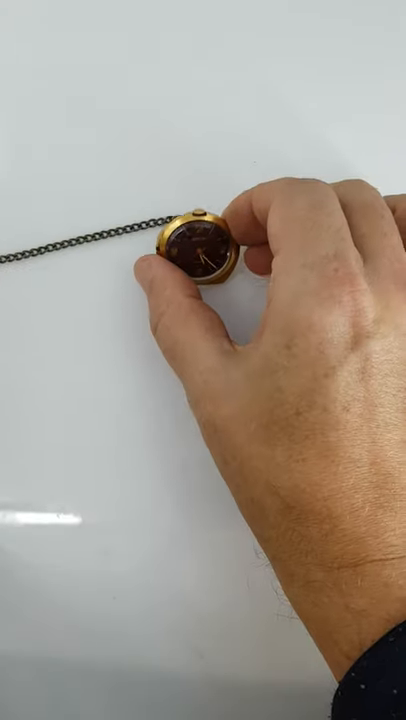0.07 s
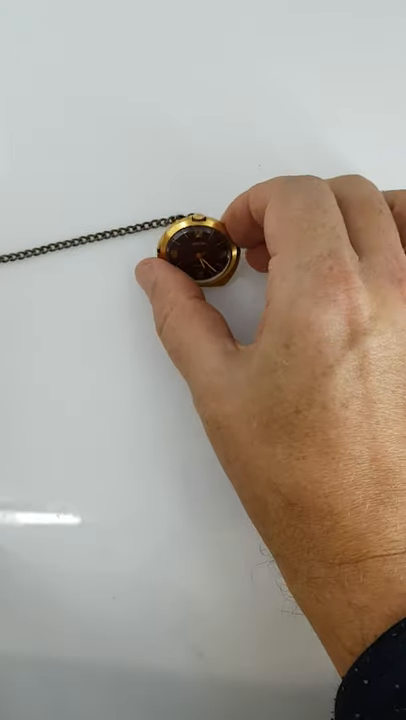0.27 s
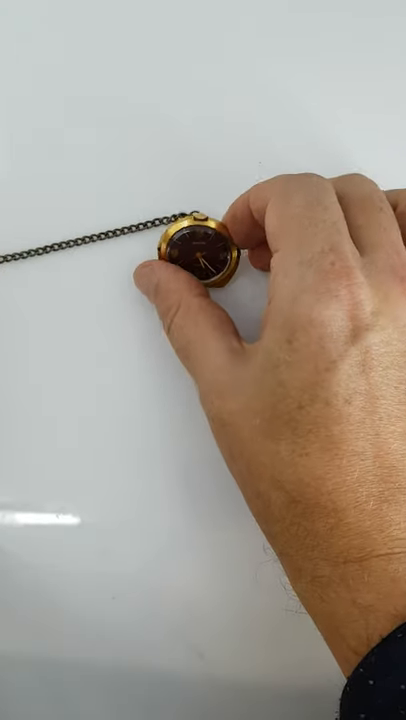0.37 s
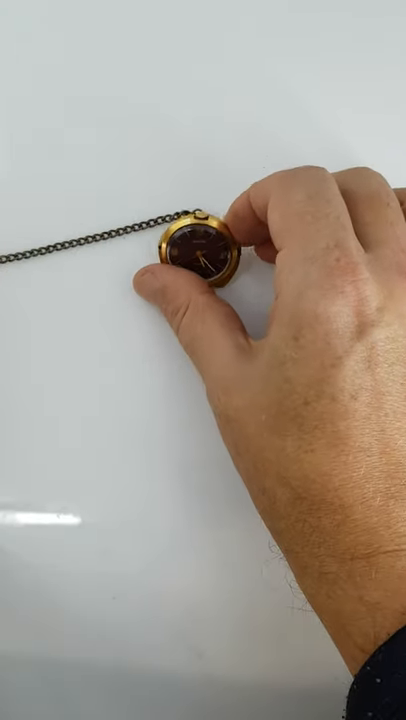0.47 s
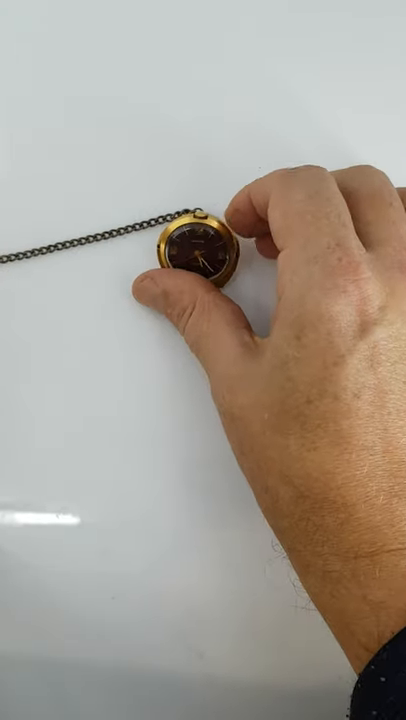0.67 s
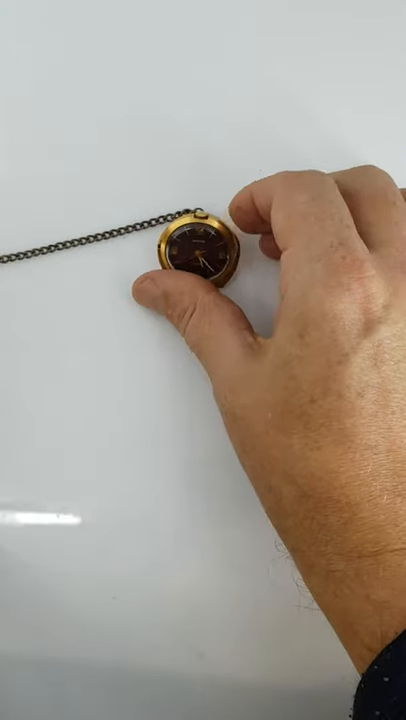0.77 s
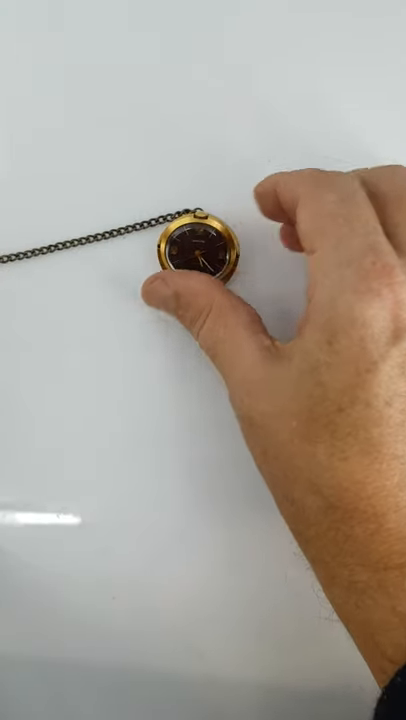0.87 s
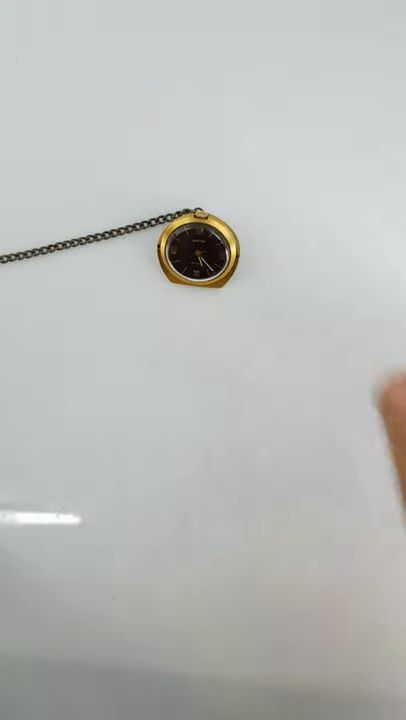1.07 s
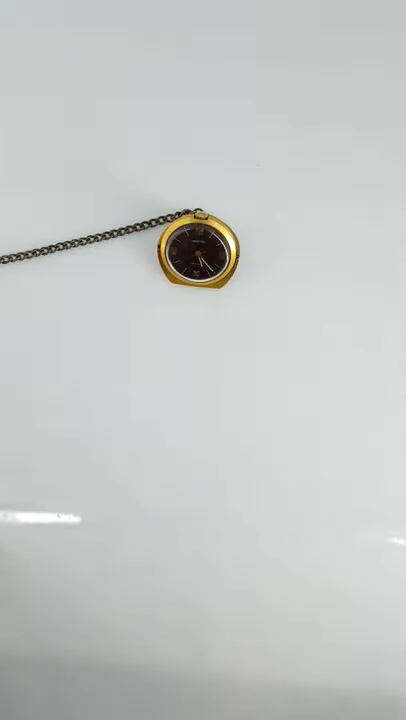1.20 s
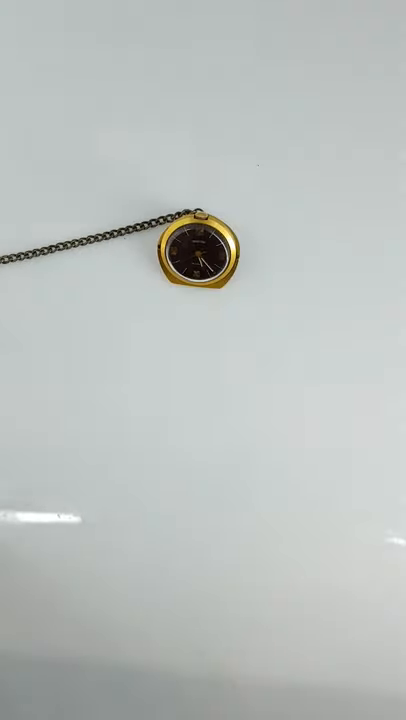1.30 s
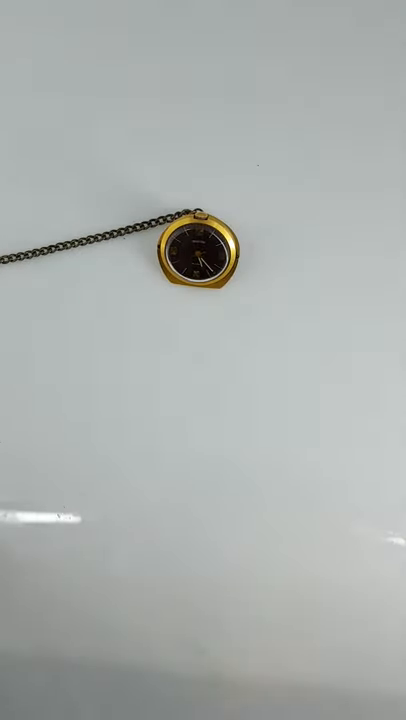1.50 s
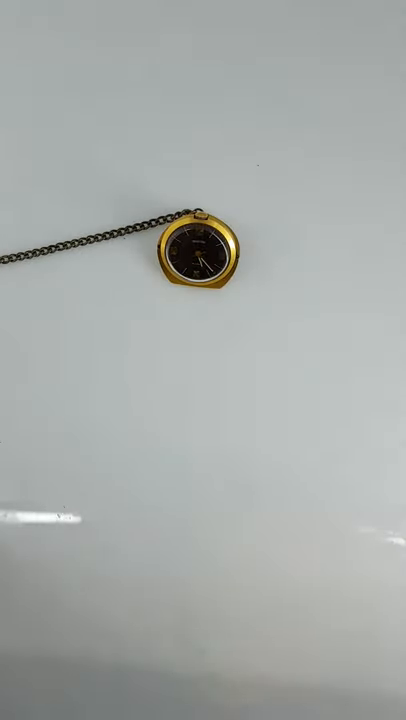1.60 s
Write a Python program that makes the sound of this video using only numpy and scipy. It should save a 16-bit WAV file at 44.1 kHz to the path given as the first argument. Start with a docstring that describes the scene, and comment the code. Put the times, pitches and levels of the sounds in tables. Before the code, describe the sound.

Light metallic clicks and knocks of a pocket watch being handled and put down.

```python
"""A small quiet room, a stereo microphone close to a hard glossy table.
A metal pocket watch is turned by hand and set down: the case knocks on the top, its bow and chain
clink, and the table thuds as the watch settles. The hand slides away with a swish and one more knock,
leaving the watch ticking faintly over room air and mains hum. Each contact is a short noise burst
ringing through the colour of the body it strikes; the hand is swells of shaped noise."""
import sys
import numpy as np
from scipy import signal
from scipy.fft import rfft, irfft
from scipy.io import wavfile
from scipy.ndimage import uniform_filter1d

SR = 44100
rng = np.random.default_rng(int(sys.argv[2]) if len(sys.argv) > 2 else 0)


def wav_out(sig):
    """Save sig, one row per channel (or a flat mono array), as 16-bit PCM at SR to the path in sys.argv[1]."""
    wavfile.write(sys.argv[1], SR, np.round(np.clip(np.atleast_2d(sig).T, -1, 1) * 32767).astype(np.int16))


N = 72765
T = np.arange(N) / SR
CONTACT_SAMPLES = 8192

# resonances of the held watch, the watch laid flat and the table, by body (negative lift is a hollow):
# pitch_hz, width_hz, lift_db
BODY_MODES = {"held": [(250, 38, 3), (667, 73, 7.5), (802, 67, 11), (1274, 140, 7.5), (1640, 71, 3.5),
              (2130, 220, -2.5), (2335, 130, 4), (2582, 200, 8), (2780, 160, -5.5), (3005, 120, 8),
              (3320, 230, 7.5), (3820, 90, 0), (4650, 135, 5.5), (5340, 56, -4), (7520, 120, 6.5),
              (13700, 210, 2.5)], "flat": [(764, 133, 12.5), (1350, 140, 1.5), (2300, 160, -6),
              (2635, 580, 9.5), (6030, 500, 10), (6960, 640, 17), (11200, 270, 10.5), (12800, 770, 6)],
              "table": [(345, 62, 4), (767, 250, 8.5), (1436, 194, 10.5), (1760, 140, 4.5),
              (2360, 360, 5.5), (2836, 320, 19), (3370, 170, 14), (3755, 220, -13), (4150, 400, 10.5),
              (4500, 200, -8), (5010, 320, 7.5)]}
# how alike left and right are for sounds at the table: frequency_hz, correlation
CLOSE_LIKENESS = [(100, 1), (350, .93), (700, 0.38), (1400, 0), (3000, 0.15), (8000, 0.004), (15000, 0)]
# how alike left and right are for diffuse sound: frequency_hz, correlation
DIFFUSE_LIKENESS = [(50, 0.82), (250, 0.88), (700, 0.21), (2000, 0.067), (10000, 0.037)]


def knocks(gain_db=12):
    """Hard contacts ring the metal and the table top together; fingers damp the ring."""
    # knocks: start_s, body, level_db, bass_db, treble_db_per_octave, ring_share, decay_s, pan_left_db
    hits = [(0.2206, "held", -4.5, -4, 2, 1, 0.0027, 1.5),
            (0.2259, "held", -17.5, 18.5, 1, 0.29, 0.0014, -1.5),
            (0.2702, "held", -19, -0.5, -1, 0.42, 0.0022, 0),
            (0.2794, "held", -15, -7, -11.5, 0.55, 0.0019, 4),
            (0.2896, "held", -11.5, -12.5, -25, 0.31, 0.001, 5.5),
            (0.297, "held", -33, 15, -4, 0.36, 0.0022, 4),
            (0.3924, "held", -31.5, -24, -9, 0.61, 0.0013, 3),
            (0.417, "held", -15.5, 1.5, -31.5, 0.38, 0.0024, 3.5),
            (0.4230, "held", -21.5, 6, -52.5, 0.69, 0.0048, -5),
            (0.4322, "held", -51, -12, -37, .2, 0.0024, -38), (0.6494, "flat", -11, -1.5, 0.5, 1, 0.002, 1),
            (0.6739, "held", -20.5, -14, -18, 0.093, .002, 4),
            (0.7694, "held", -26.5, -17, -7.5, 0.44, .002, -6),
            (0.7731, "held", -31, -9, -6.5, 0.48, 0.006, 8.5),
            (0.8002, "held", -36.5, 0.5, -5, .4, .003, 0), (1.1040, "table", -10.5, 1, 1, 0.83, .0021, 1),
            (1.2170, "table", -25.5, -9.5, -34, .3, 0.0038, 4),
            (1.2330, "table", -36.5, 5, 1.5, 0.31, 0.0034, 4)]
    # broad colour of a knock, by body: frequency_hz, level_db
    colours = {"held": [(60, -27.5), (140, -24), (215, -5.5), (330, -6.5), (500, -3), (740, 1.5),
               (1100, -4), (2000, -3.5), (3300, -2.5), (5000, -6), (9000, -16), (15000, -17)],
               "flat": [(60, -19), (170, -9.5), (400, -5), (550, -19), (850, -2.5), (1700, -2.5),
               (3000, -8), (4500, -23.5), (9000, -28), (14000, -23.5)], "table": [(40, -24), (140, -14.5),
               (240, -2.5), (550, -6), (750, 0), (1100, -5), (1450, 1), (2000, -5), (2800, -8), (5000, -10),
               (9000, -23.5), (15000, -23)]}
    # how each body rings out: hold_s, tail_db, tail_s
    ring_out = {"held": (0.0013, -18, 0.013), "flat": (0.0017, -24, 0.018), "table": (0.0027, -21.5, 0.017)}
    out = np.zeros((2, N))
    for start_s, body, level_db, bass_db, treble_slope, ring_share, decay_s, pan_db in hits:
        body_db = at_hz(colours[body], bins(CONTACT_SAMPLES)) + ring_share * resonances(BODY_MODES[body])
        colour_db = gain_db + level_db + body_db + shelves(bass_db, treble_slope)
        hold_s, tail_db, tail_s = ring_out[body]
        add(out, start_s, contact(colour_db, pan_db, hold_s, decay_s, tail_db, tail_s))
    return out


def clinks(gain_db=8, ring_share=0.48):
    """The bow and chain flick against the case, bright and light."""
    # clinks: start_s, level_db, treble_db_per_octave, decay_s, pan_left_db
    hits = [(0.0030, -33.5, -6, 0.0049, 3), (0.119, -35.5, -2, 0.0024, 5), (0.1798, -49.5, 0.5, .002, 14),
            (0.214, -23.5, -1.5, 0.0081, -11), (0.2370, -17.5, 3, 0.0037, 10),
            (0.243, -14, 0.5, 0.0056, -3.5), (0.2470, -16.5, -0.5, 0.0047, 5),
            (0.2733, -16.5, -2, 0.005, -2), (0.3140, -30, -5.5, 0.001, -1),
            (0.5026, -31.5, 1.5, 0.0037, 1.5), (0.5370, -28.5, 1, 0.0023, 0), (0.5441, -22.5, 0, .003, 0),
            (0.5504, -14.5, 0.5, 0.0035, 1), (0.5605, -28.5, -1.5, .003, -0.5)]
    # colour of small metal parts: frequency_hz, level_db
    colour = [(60, -30), (140, -26), (250, -8.5), (700, -1), (1800, 1), (4000, -0.5), (6500, -3),
              (9500, -9), (14000, 0.5), (16000, -2.5)]
    out = np.zeros((2, N))
    body_db = at_hz(colour, bins(CONTACT_SAMPLES)) + ring_share * resonances(BODY_MODES["held"])
    for start_s, level_db, treble_slope, decay_s, pan_db in hits:
        colour_db = gain_db + level_db + body_db + shelves(0, treble_slope)
        clink = contact(colour_db, pan_db, hold_s=0.0023, decay_s=decay_s, tail_db=-15, tail_s=0.0082)
        add(out, start_s, clink)
    return out


def thuds(gain_db=10):
    """Dull table thuds as the watch settles, and again as the withdrawing hand knocks the table."""
    # soft thuds: start_s, level_db, bass_db
    hits = [(0.6726, -3, -7.5), (0.679, -8.5, -4), (0.6923, -25.5, 11), (0.705, -18, -1),
            (0.7112, -30.5, 4.5), (0.7270, -31.5, 11.5), (1.116, -22.5, 5), (1.1320, -33.5, 5),
            (1.154, -39.5, 9.5)]
    # dull colour of the table: frequency_hz, level_db
    colour = [(25, -19.5), (55, -14), (90, -4.5), (170, -0.5), (310, 0.5), (700, 1), (1200, -11),
              (2500, -24), (16000, -55)]
    out = np.zeros((2, N))
    body_db = at_hz(colour, bins(CONTACT_SAMPLES))
    for start_s, level_db, bass_db in hits:
        colour_db = gain_db + level_db + body_db + shelves(bass_db, 0)
        thud = contact(colour_db, pan_db=0, hold_s=0.0019, decay_s=0.0032, tail_db=-14, tail_s=0.015)
        add(out, start_s, thud)
    return out


def ticks(first_s=0.084, gap_s=0.2, tick_db=-32.5, tock_db=-31.5):
    """The escapement ticks five times a second on alternate pallets, one louder than the other."""
    # thin, high colour of a tick: frequency_hz, level_db
    colour = [(1000, -32), (10500, -21), (11200, -4.5), (11450, -1), (11750, -12), (12400, -17.5)]
    out = np.zeros((2, N))
    for beat, start_s in enumerate(np.arange(first_s, N / SR, gap_s)):
        colour_db = (tock_db if beat % 2 else tick_db) + at_hz(colour, bins(CONTACT_SAMPLES))
        tick = contact(colour_db, pan_db=0, hold_s=0.0033, decay_s=0.0022, tail_db=-25, tail_s=0.006)
        add(out, start_s, tick)
    return out


def slides():
    """Skin and sleeve slide on the table: friction hiss swells and fades with the hand."""
    # strokes of the hand: start_s, peak_s, end_s, level_db, treble_db_per_octave
    strokes = [(0.147, 0.141, 0.21, -56, -16), (0.187, 0.235, 0.36, -58, -11), (0.51, 0.533, 0.5, -58, 0.5),
               (1.065, 1.096, 1.120, -52, 2), (1.092, 1.111, 1.238, -54, 0.5),
               (1.11, 1.156, 1.200, -56.5, 5.5)]
    # colour of the friction: frequency_hz, level_db
    colour = [(100, -21), (500, -0.5), (1000, 0.5), (2500, -2), (5500, -7.5), (9000, -18.5), (15000, -16.5)]
    out = np.zeros((2, N))
    for start_s, peak_s, end_s, level_db, treble_slope in strokes:
        swell = from_db(level_db) * np.interp(T, [start_s, peak_s, end_s], [0, 1, 0])
        tilted = [(hz, db + treble_slope * octaves_of_treble(hz)) for hz, db in colour]
        out += swell * noise(tilted, CLOSE_LIKENESS)
    return out


def rustles(fall_db_per_octave=12.5):
    """The moving hand and sleeve make a soft, dull rustle."""
    # moves of the hand: start_s, peak_s, end_s, level_db, centre_hz
    moves = [(-0.08, 0, 0.097, -60, 186), (0.204, 0.383, 1, -63, 447), (0.797, 0.97, 1.25, -72.5, 460)]
    out = np.zeros((2, N))
    for start_s, peak_s, end_s, level_db, centre_hz in moves:
        swell = from_db(level_db) * np.interp(T, [start_s, peak_s, end_s], [0, 1, 0])
        band = [(hz, -fall_db_per_octave * abs(np.log2(hz / centre_hz))) for hz in bins(CONTACT_SAMPLES)]
        out += swell * noise(band, DIFFUSE_LIKENESS)
    return out


def room(direct, t60_s=0.22, level_db=-19.5, delay_s=0.0065):
    """The small room returns a short diffuse tail, different on each side."""
    # colour of the reflections: frequency_hz, level_db
    colour = [(100, 16), (600, 4.5), (2500, 2.5), (6000, -2.5), (15000, -2)]
    tail = noise(colour, DIFFUSE_LIKENESS) * from_db(-60 * T / t60_s) * (T > delay_s)
    tail /= np.sqrt(np.sum(tail ** 2) / 2)
    return from_db(level_db) * signal.fftconvolve(direct, tail, axes=1)[:, :N]


def room_tone(hum_hz=120.2, hum_db=-80):
    """Room air with a faint mains hum."""
    # colour of the air: frequency_hz, level_db
    colour = [(25, -6.5), (70, -6), (120, 0), (180, -1), (260, -5.5), (420, -2), (620, -1.5), (900, -4),
              (1400, -9), (2200, -12.5), (3500, -16), (5500, -21.5), (9500, -26.5), (12000, -23),
              (15500, -18)]
    # slow drift of the air: time_s, level_db
    drift = [(0, -64), (0.1, -64.5), (0.45, -62.5), (0.85, -66), (1.02, -64), (1.3, -65), (1.65, -67.5)]
    air = from_db(np.interp(T, *np.transpose(drift))) * noise(colour, DIFFUSE_LIKENESS)
    hum = from_db(hum_db) * np.sqrt(2) * np.sin(2 * np.pi * hum_hz * T)
    return air + hum


def contact(colour_db, pan_db, hold_s, decay_s, tail_db, tail_s, attack_s=0.00023):
    """A dense burst of micro-impacts, evened in spectrum, rings through the body's colour."""
    t = np.arange(CONTACT_SAMPLES) / SR
    rise = 1 - np.exp(-t / attack_s)
    fall = np.exp(-np.maximum(t - hold_s, 0) / decay_s) + from_db(tail_db) * np.exp(-t / tail_s)
    burst = rfft(rng.standard_normal((2, CONTACT_SAMPLES)) * fall * rise)
    smoothed = np.sqrt(uniform_filter1d(abs(burst) ** 2, size=55, axis=1))
    ring = burst * minimum_phase(from_db(colour_db) / smoothed)
    balance = from_db([[pan_db / 2], [-pan_db / 2]])
    return irfft(stereo(ring, CLOSE_LIKENESS, bins(CONTACT_SAMPLES))) * balance


def resonances(modes):
    """Gain in dB of a body's resonances, as bell curves."""
    hz = bins(CONTACT_SAMPLES)
    return sum(db * 0.5 ** ((2 * (hz - pitch_hz) / width_hz) ** 2) for pitch_hz, width_hz, db in modes)


def shelves(bass_db, treble_slope, bass_hz=580):
    """Tilt in dB: a heavy contact has more bass, and hardness sets the slope of the treble."""
    hz = bins(CONTACT_SAMPLES)
    return bass_db / (1 + (hz / bass_hz) ** 2) + treble_slope * octaves_of_treble(hz)


def octaves_of_treble(hz, corner_hz=2800):
    """Octaves above the treble corner, with a soft knee."""
    return np.log2(1 + (hz / corner_hz) ** 4) / 4


def minimum_phase(gain):
    """Causal filter with this gain: nothing sounds early."""
    cepstrum = irfft(np.log(gain + 1e-9))
    fold = 1 + np.sign(CONTACT_SAMPLES // 2 - np.arange(CONTACT_SAMPLES))
    fold[0] = 1
    return np.exp(rfft(cepstrum * fold))


def noise(colour, likeness):
    """Stereo noise of rms 1 with this colour and left-right likeness."""
    hz = bins(N)
    white = stereo(rfft(rng.standard_normal((2, N))), likeness, hz)
    shaped = irfft(white * from_db(at_hz(colour, hz)), N)
    return shaped / shaped.std()


def stereo(pair, likeness, hz):
    """Two unrelated spectra become left and right with the given likeness."""
    correlation = np.clip(at_hz(likeness, hz), -0.99, 0.99)
    mid = np.sqrt((1 + correlation) / 2) * pair[0]
    side = np.sqrt((1 - correlation) / 2) * pair[1]
    return np.array([mid + side, mid - side])


def from_db(db):
    """Decibels to gain."""
    return 10 ** (np.asarray(db) / 20)


def bins(size):
    """Frequencies of a spectrum, floored at 1 Hz."""
    return np.maximum(np.fft.rfftfreq(size, 1 / SR), 1)


def at_hz(points, hz):
    """Read a table on a log-frequency axis."""
    points_hz, values = np.transpose(points)
    return np.interp(np.log(hz), np.log(points_hz), values)


def add(out, start_s, sound):
    """Mix a contact in at its start time."""
    i = max(int(start_s * SR), 0)
    out[:, i:i + CONTACT_SAMPLES] += sound[:, :N - i]


def scene():
    """The watch and hand up close, with the room behind them."""
    direct = knocks() + clinks() + thuds() + slides() + ticks()
    return direct + room(direct) + rustles() + room_tone()


def record(dry, cutoff_hz=16000):
    """The recorder cuts the top steeply."""
    return signal.sosfilt(signal.ellip(10, 0.2, 70, cutoff_hz, fs=SR, output="sos"), dry)


dry = scene()
out = record(dry)
wav_out(out)
```